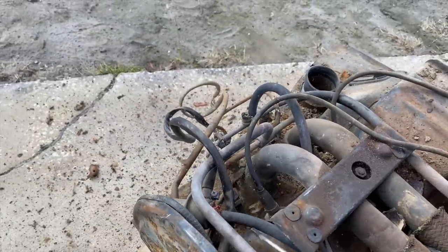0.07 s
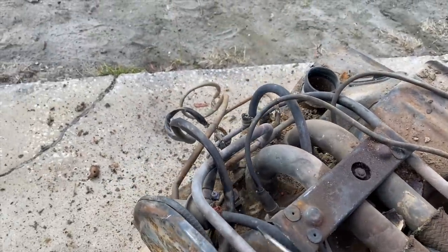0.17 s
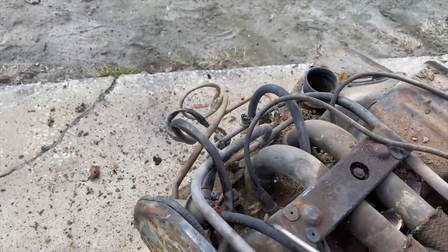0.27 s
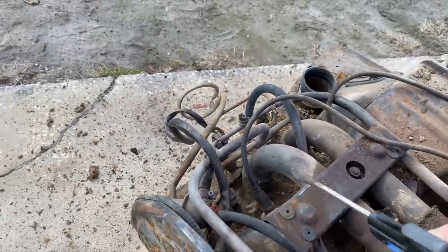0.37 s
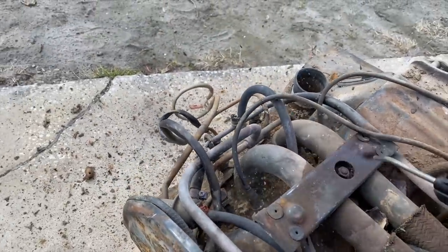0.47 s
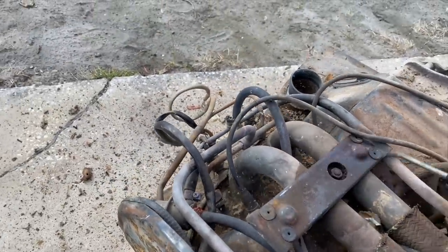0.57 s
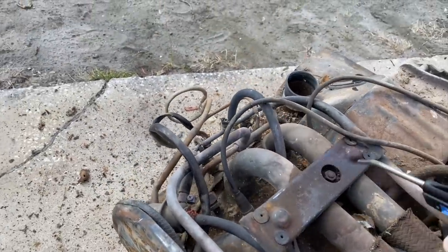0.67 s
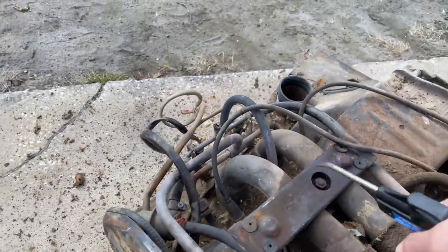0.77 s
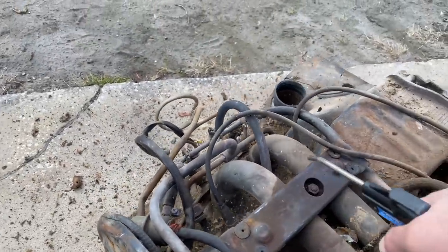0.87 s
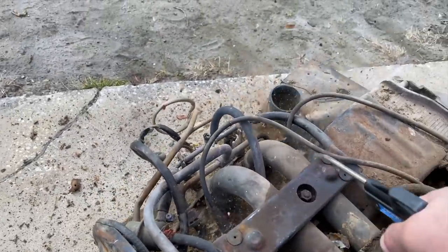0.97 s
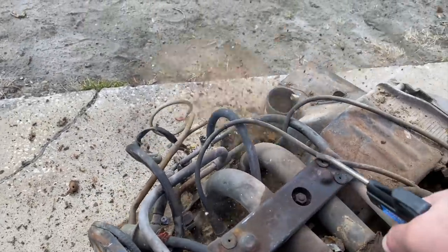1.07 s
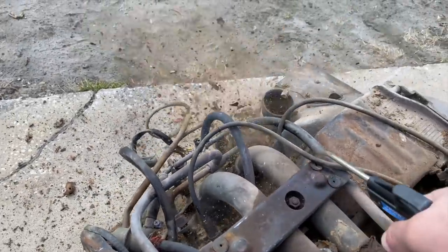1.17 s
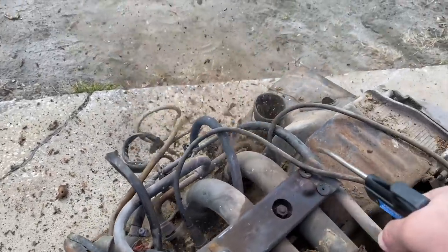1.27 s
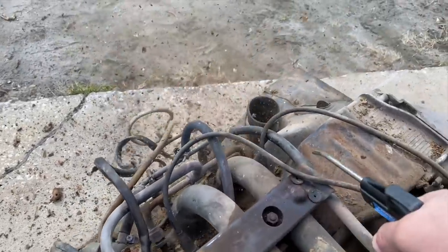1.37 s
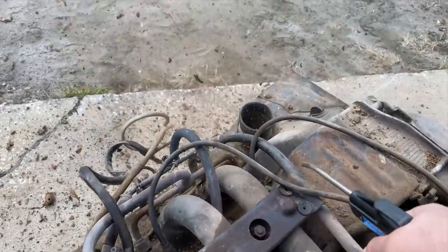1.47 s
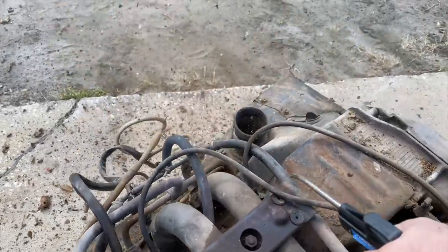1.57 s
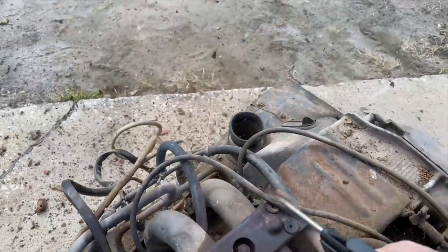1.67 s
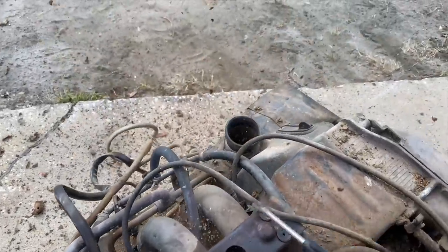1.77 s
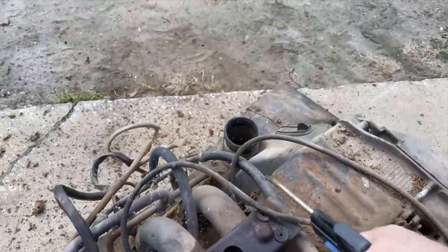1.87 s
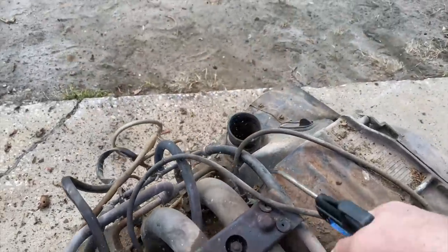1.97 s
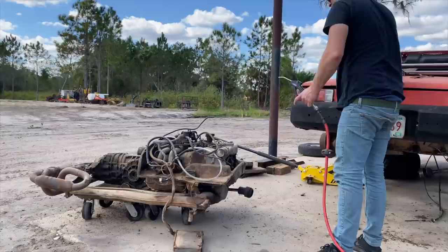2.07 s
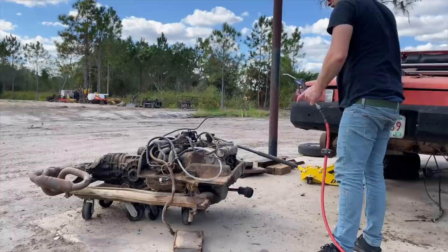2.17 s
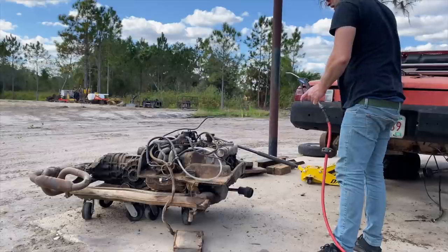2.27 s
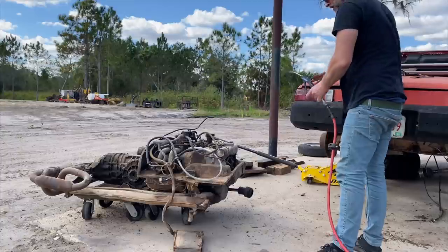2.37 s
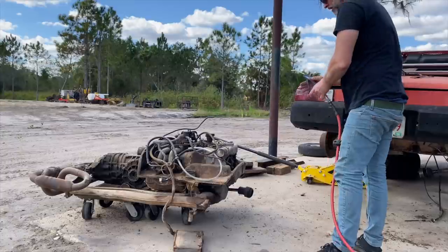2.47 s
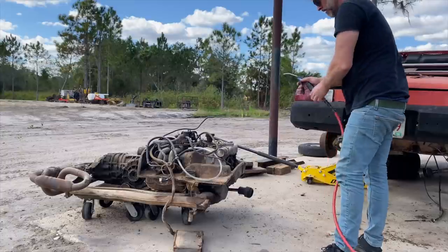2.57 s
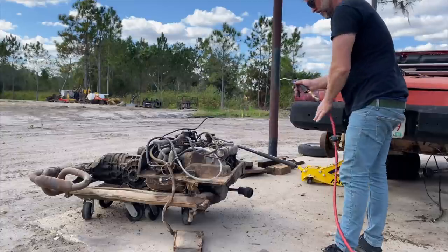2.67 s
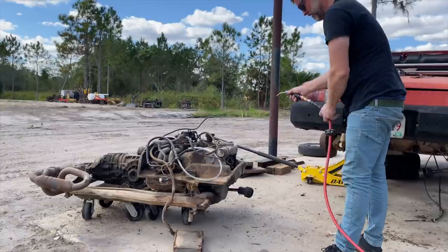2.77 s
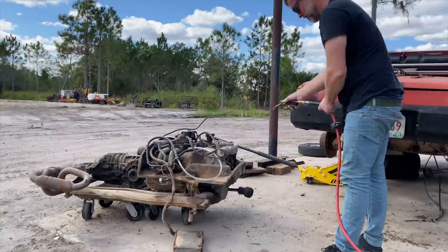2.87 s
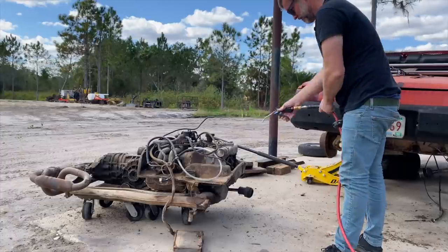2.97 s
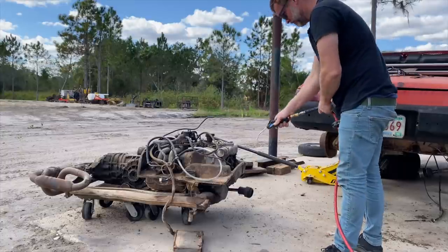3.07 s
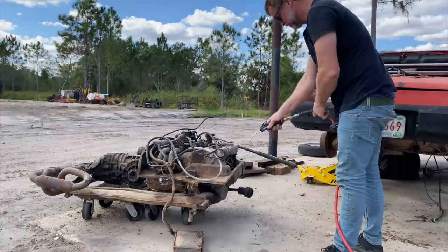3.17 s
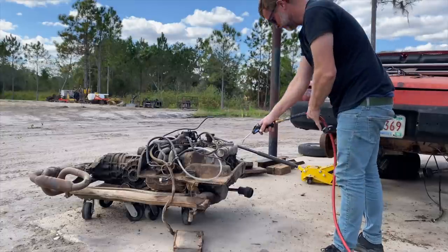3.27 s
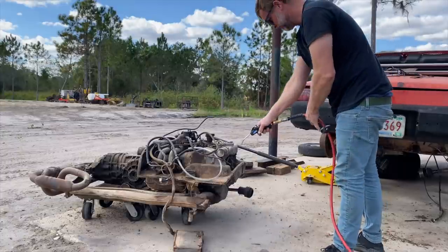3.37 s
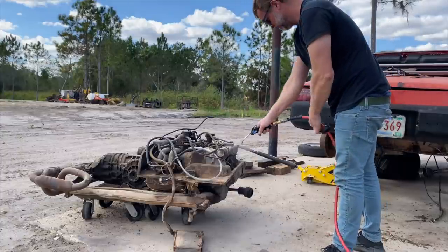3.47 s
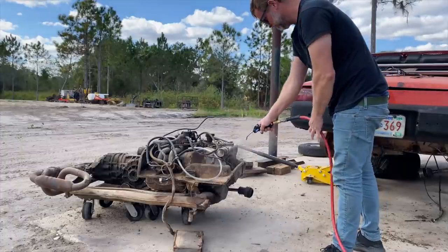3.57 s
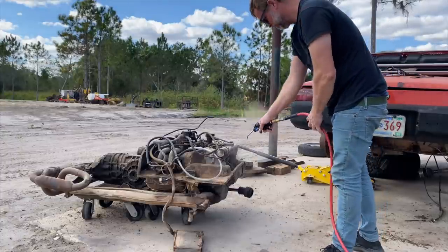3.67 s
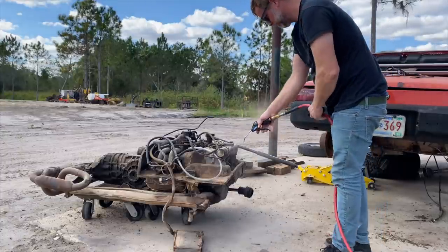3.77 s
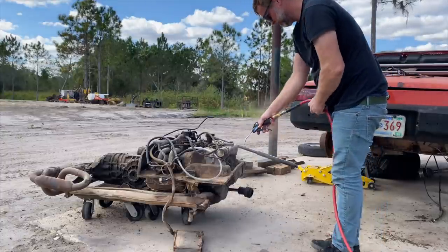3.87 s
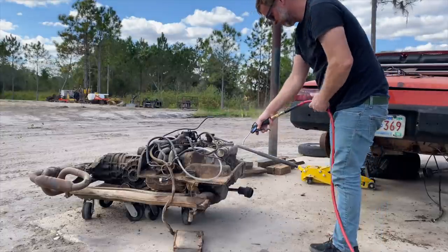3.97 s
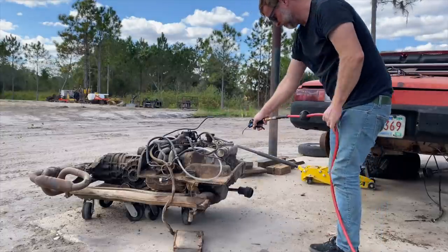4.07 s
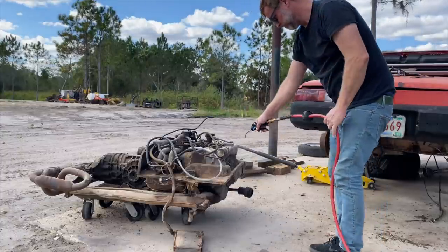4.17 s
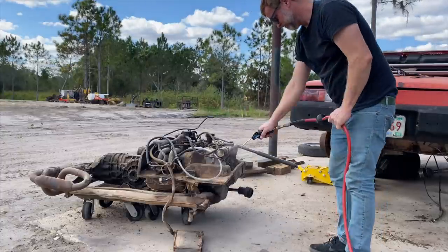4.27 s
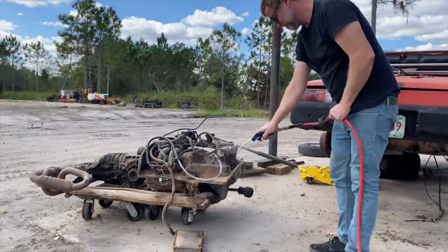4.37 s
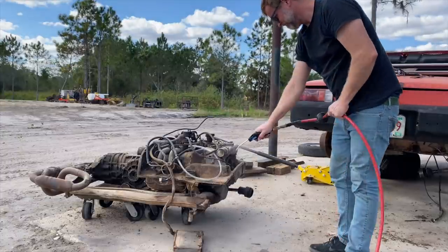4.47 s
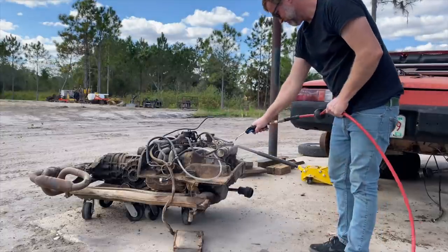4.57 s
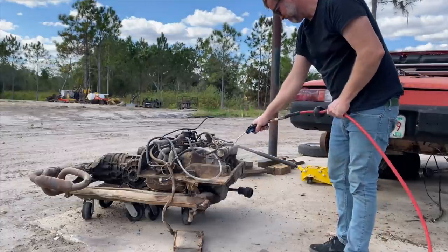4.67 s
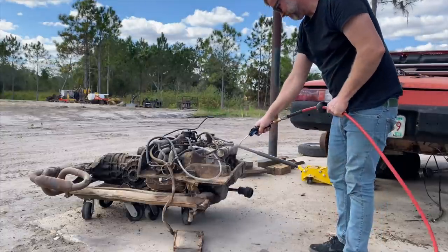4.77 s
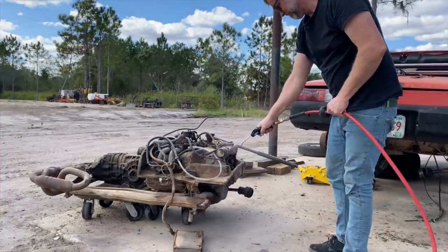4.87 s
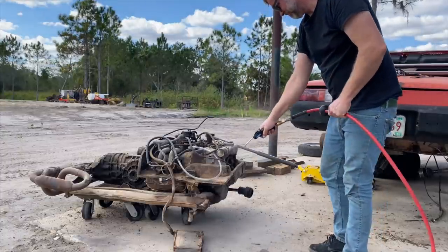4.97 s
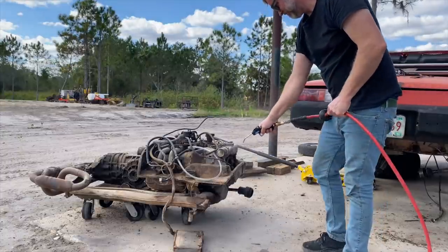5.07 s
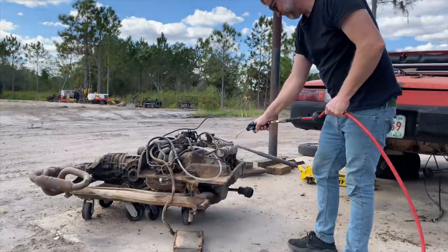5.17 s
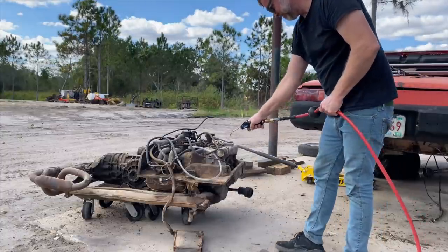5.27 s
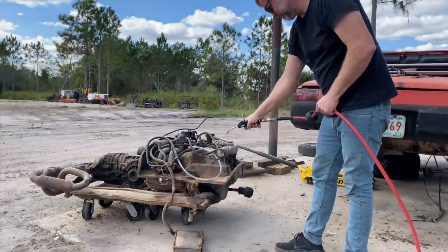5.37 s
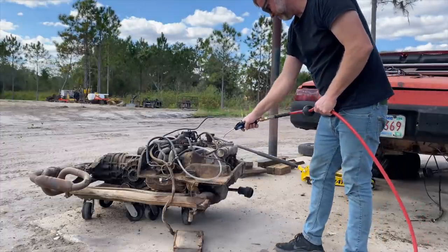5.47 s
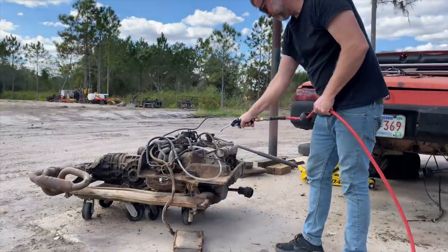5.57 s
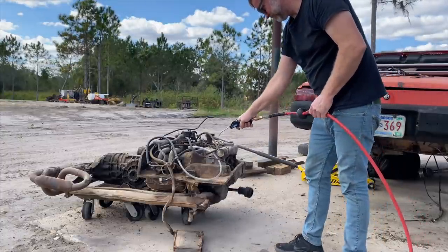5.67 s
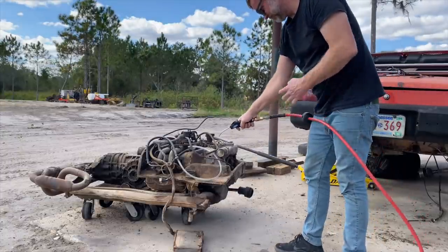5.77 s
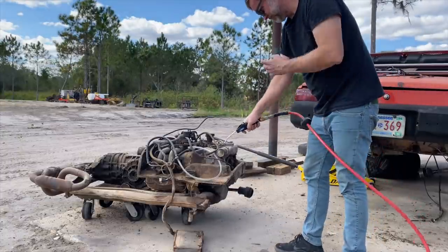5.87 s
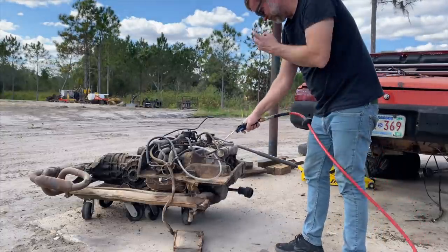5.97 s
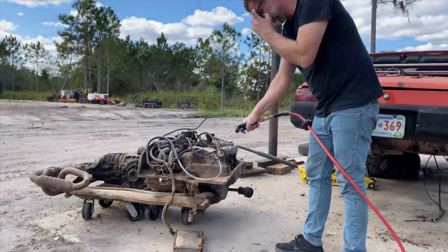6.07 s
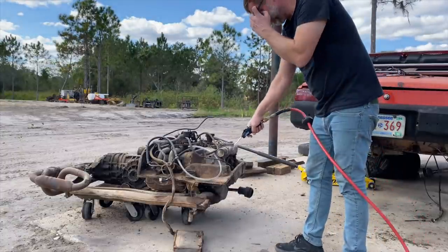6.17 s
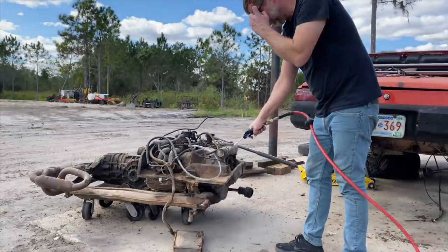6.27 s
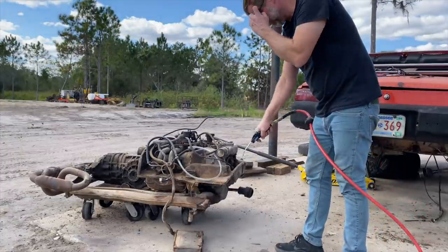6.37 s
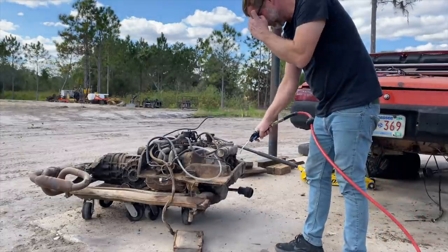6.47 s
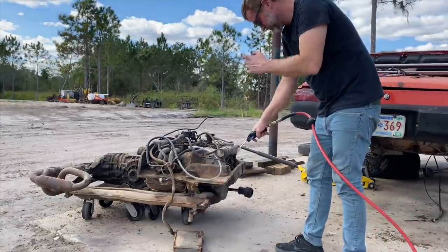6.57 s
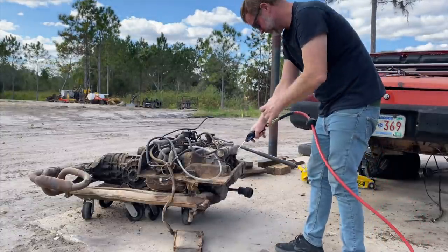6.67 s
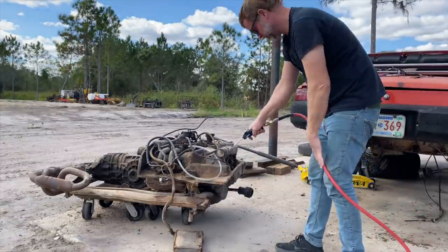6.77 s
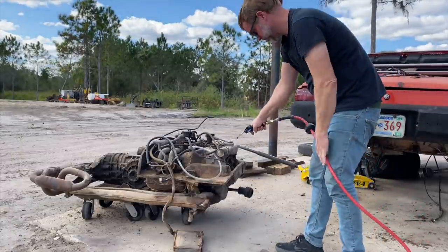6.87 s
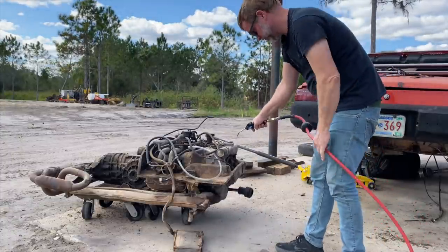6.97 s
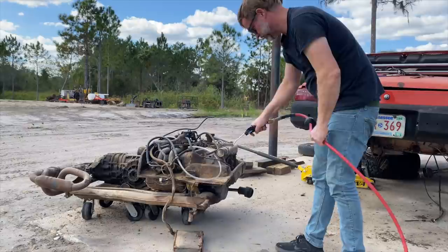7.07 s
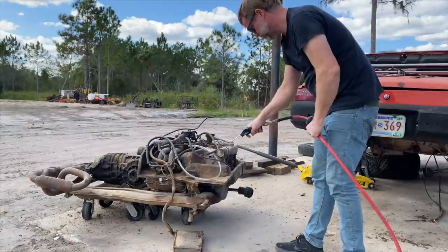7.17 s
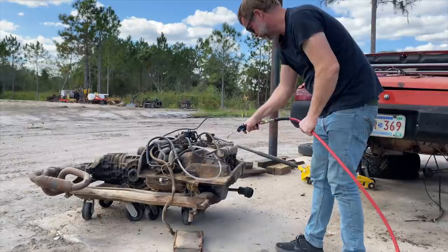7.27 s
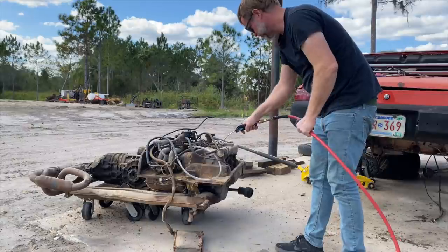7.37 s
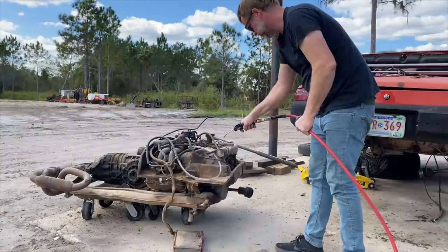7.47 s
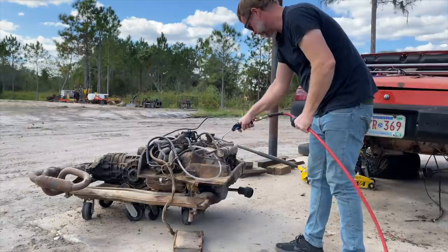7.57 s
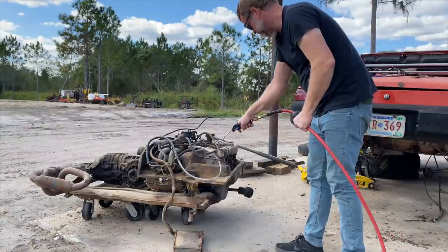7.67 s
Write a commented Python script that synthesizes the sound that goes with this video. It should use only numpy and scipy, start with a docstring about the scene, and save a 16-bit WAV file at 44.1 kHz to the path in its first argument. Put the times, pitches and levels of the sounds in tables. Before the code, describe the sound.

A compressed-air gun blasts dirt off an engine in an open yard. A close, very bright hiss wavers with breathy whistling edges and small gusts on the microphone, then stops abruptly. Faint outdoor roar and tiny fitting clicks follow. From a few steps away come a very short burst, a slightly longer one, and a long sustained blast, rougher and hollower as it sweeps over metal.

```python
"""Compressed-air blow gun on an engine

A blow gun blasts dirt off an engine on a concrete yard: first close by, then three bursts from a few steps away.
The nozzle is hissing noise, the jet rasps on edges and excites hollows, and echoes off the metal shift with the hand.
Stray gusts buffet the microphone; the fitting snaps and rings between bursts and air seeps faintly throughout.
Beneath lies a quiet yard of distant roar, lumpy breeze and faint hum."""
import sys
import numpy as np
from scipy import signal
from scipy.fft import rfft, irfft
from scipy.io import wavfile

SR = 44100
rng = np.random.default_rng(int(sys.argv[2]) if len(sys.argv) > 2 else 0)


def pcm_store(signal):
    """Save signal as 16-bit PCM."""
    levels = np.round(np.clip(np.atleast_2d(signal), -1, 1) * 32767)
    wavfile.write(sys.argv[1], SR, levels.astype(np.int16).T)


N = 341334
TIME = np.arange(N) / SR  # s
BINS = np.fft.rfftfreq(1024, 1 / SR)  # Hz
FRAMES = np.arange(N // 256 + 5) * 256 / SR  # s

# Distant outdoor roar. Each row: frequency in Hz, relative density in dB per Hz.
ROAR_SPECTRUM = [(40, -23.5), (100, 14), (300, -3), (550, -6), (850, 3.5), (1200, -2.5), (1800, -11.5),
                 (4000, -17), (12000, -34.5)]
# Yard background over time. Each row: time in seconds, distant roar in dB, low breeze in dB before its flutter.
YARD_LEVELS = [(0, -81, -64), (2.1, -63, -71), (2.17, -57, -57.5), (2.4, -57.5, -63.5), (2.7, -61, -66),
               (3.0, -75, -72.5), (3.9, -75.5, -71.5), (4.11, -73.5, -80), (4.15, -78, -75),
               (7.74, -61, -77)]
# Puffs of air when the hose is flexed. Each row: on in seconds, off in seconds, level in dB.
LEAK_PUFFS = [(2.1, 2.45, -71.5), (2.447, 2.726, -64.5), (2.486, 2.58, -61), (2.92, 3.05, -58.5),
              (3.72, 3.84, -68), (3.8, 4.11, -73), (3.915, 3.968, -67), (4.07, 4.116, -69),
              (4.172, 4.195, -66)]
# Clicks of the gun and hose fitting. Each row: start in seconds, snap peak in dB, body ring peak in dB.
FITTING_CLICKS = [(2.222, -51.5, -74), (2.2575, -49, -69), (2.461, -41, -44), (2.474, -47, -44),
                  (2.587, -46, -35), (2.5902, -33, -29), (2.596, -33, -45), (2.6, -38, -27),
                  (2.604, -38, -44), (2.6084, -35, -54), (2.6115, -36, -30), (2.617, -45, -40),
                  (2.6605, -41.5, -68), (3.907, -55, -62), (3.921, -48, -56), (4.105, -48, -54),
                  (4.176, -44, -68)]
# Modes of the gun body. Each row: frequency in Hz, relative level in dB, time to fall 60 dB in seconds.
BODY_MODES = [(1990, -19, 0.0054), (2430, 14, 0.0048), (2830, 6, 0.0057), (3300, 3, .005),
              (5930, -11, .008)]
# Gusts on the microphone. Each row: start in seconds, relative level in dB, length in seconds,
# starting brightness in Hz.
MICROPHONE_GUSTS = [(0.492, -31, 0.026, 744), (0.521, -33.5, 0.069, 1004), (0.587, -38, 0.1, 1200),
                    (1.651, -41, 0.058, 900), (1.795, -36.5, 0.031, 800), (4.005, -55.5, 0.08, 130),
                    (5.912, -47, 0.028, 900), (6.423, -49, 0.7, 150), (6.736, -41.5, 0.067, 400),
                    (7.64, -48, 0.13, 160)]
# Breathy notes as the jet crosses a lip, gap or pipe mouth. Each row: start in seconds, end in seconds,
# first pitch in Hz, last pitch in Hz, width in Hz, level in dB before the fades.
EDGE_TONES = [ (.01, 0.094, 4244, 4220, 3000, -33.5), (0.099, .3, 3100, 2960, 700, -45),
              (0.257, 0.46, 1300, 1174, 200, -42), (0.388, 0.477, 5340, 6030, 3000, -29),
              (.48, 0.653, 12750, 13100, 1200, -22.5), (0.679, 0.783, 5930, 5450, 2630, -33),
              (0.841, 1.321, 2072, 1906, 900, -44), (0.959, 1.14, 11950, 12250, 1300, -30),
              (1.17, 1.291, 12200, 12600, 1100, -29.5), (1.05, 1.178, 6360, 6500, 4000, -34.5),
              (1.471, 1.63, 4350, 4410, 2000, -38.5), (1.672, 1.899, 1800, 1620, 550, -46.5),
              (3.181, 3.502, 1088, 1000, 260, -50), (3.351, 3.73, 251, 250, 79.4, -46.5),
              (3.55, 3.63, 525, 565, 300, -43.5), (4.346, 4.514, 576, 596, 180, -43.5),
              (5.017, 5.19, 243, 209, 80, -51), (5.886, 5.965, 584, 639, 220, -43),
              (6.107, 6.254, 609, 535, 201, -46), (6.245, 6.397, 1837, 1503, 550, -42),
              (6.453, 6.898, 979, 1103, 320, -47), (7.02, 7.19, 2200, 2434, 900, -45),
              (7.34, 7.489, 2475, 2670, 1490, -39)]

# Spectra of the nozzle hiss. Each row: frequency in Hz, relative density in dB per Hz.
CLOSE_HISS = [(100, -55), (2000, -53), (5000, -11.5), (8000, -5.5), (9300, -4.5), (10500, -3), (11100, -1),
              (12100, 1), (13000, -2.5), (13900, -3.5), (15800, -8)]
FAR_HISS = [(100, -53), (1500, -25.5), (4000, -14), (6000, -8.5), (7700, -7), (9000, -6), (10200, -4),
            (11400, 1), (12700, -1.5), (14000, -5), (15800, -10)]
# Spectra of the rasp on edges. Each row: frequency in Hz, relative density in dB per Hz.
CLOSE_RASP = [(100, -41), (500, -24), (1000, -12.5), (1300, 2), (2000, 3.5), (3100, 2), (3800, 1.5),
              (5500, 1.5), (8000, -9.5), (15000, -23)]
FAR_RASP = [(100, -39.5), (500, -26), (1000, -3), (1400, -2), (1700, 2), (2000, 1), (2450, 4), (3600, 2.5),
            (5500, -1), (8000, -0.5), (15000, -9.5)]
# Resonance of the hollows between engine parts. Each row: frequency in Hz, relative density in dB per Hz.
HOLLOW_SPECTRUM = [(60, -45.5), (200, -26.5), (420, -9), (520, -7), (650, -3), (770, 0), (970, 1.5),
                   (1200, -0.5), (1650, -5), (3000, -19)]
# Spectra of the slow eddies. Each row: frequency in Hz, relative density in dB per Hz.
CLOSE_EDDIES = [(30, -29.5), (60, -17), (120, -0.5), (190, -3), (300, 2.5), (480, 0.5), (900, -20.5),
                (2000, -42)]
FAR_EDDIES = [(30, -28.5), (55, -13.5), (90, -3), (150, -4), (205, 2), (250, 3.5), (330, -3), (480, -3),
              (900, -12.5), (2000, -47.5)]

# The jet crosses an edge and rasps. Each row: on in seconds, off in seconds, rasp in dB before the layer
# trim, lift of the hiss in dB.
EDGE_PASSES = [(0.247, 0.294, -38, -0.5), (0.353, 0.597, -37.5, 0.9), (3.183, 3.436, -37, 0.5),
               (4.31, 4.358, -30, 4), (4.464, 4.568, -31.5, 0.5), (4.586, 4.652, -31, -.5),
               (4.684, 4.717, -36, 1), (5.206, 5.286, -31, 3.5), (5.415, 5.503, -27, 4),
               (5.51, 5.566, -39, 0.5), (5.655, 5.698, -31, 0.5), (5.81, 5.848, -28, 0.5),
               (5.984, 6.103, -27, 2.5), (6.248, 6.332, -32, 1.5), (6.764, 6.81, -30.5, 2),
               (7.021, 7.127, -30.5, 2), (7.138, 7.213, -28, 5), (7.228, 7.3, -29.5, 2),
               (7.364, 7.48, -28.5, -1.5), (7.498, 7.76, -31.5, -1.5)]
# The jet dips into a hollow. Each row: on in seconds, off in seconds, level in dB before slips and layer trim.
HOLLOW_PASSES = [(0.022, 0.103, -49), (0.237, 0.374, -45), (.4, 0.45, -44), (0.505, .63, -43),
                 (.96, 1.03, -48), (1.19, 1.318, -48.5), (1.63, 1.818, -47), (1.91, 2.056, -49.5),
                 (3.05, 3.094, -51), (3.189, 3.503, -39.5), (3.5, 3.665, -47.5), (4.258, 4.343, -32.5),
                 (4.375, 4.5, -38), (5.2, 5.295, -44), (5.49, 5.703, -46.5), (5.806, 5.844, -35.5),
                 (5.91, 5.933, -36.5), (5.977, 6.038, -38), (6.065, 6.387, -43), (6.447, 6.665, -44),
                 (7.257, 7.332, -37), (7.628, 7.76, -46)]
# The jet slips off the hollows into open air. Each row: on in seconds, off in seconds.
SLIPS = [(.66, .72), (.86, 0.91), (5.1, 5.14), (5.74, 5.74), (6.39, 6.455), (7.19, 7.2), (7.38, 7.6)]
# The jet spills over a broad surface and sheds slow eddies. Each row: on in seconds, off in seconds,
# level in dB before the layer trim.
SPILLS = [(.05, 0.21, -54.5), (.33, .45, -58), (0.628, 0.773, -51), (1.06, 1.257, -56), (1.61, 1.836, -55),
          (3.164, 3.3, -52), (3.363, 3.7, -48.5), (4.237, 4.32, -44), (4.745, 4.936, -50.5),
          (4.986, 5.18, -52), (5.87, 5.946, -46), (5.98, 6.14, -54), (6.348, 7.013, -45.5)]
# Close hiss as the nozzle is turned. Each row: time in seconds, level in dB before edge lifts and layer trim.
CLOSE_AIM = [(0, -25.5), (.19, -24.5), (.32, -28.5), (.53, -22), (.62, -24.5), (.69, -31), (.74, -26),
             (.81, -32), (.95, -34), (1.08, -29.5), (1.25, -31), (1.33, -29.3), (1.55, -29), (1.66, -23),
             (1.74, -29.3), (1.8, -29), (1.92, -30), (2.01, -28)]
# The far nozzle turns toward and away from the microphone. Each row: time in seconds, change of the hiss in dB.
FAR_AIM = [(4.2, 1), (4.42, -0.5), (4.85, 0.5), (5.15, -1.3), (5.37, -2.5), (5.9, .8), (6.7, 0.4),
           (6.96, -1), (7.74, 0.5)]
# Trigger pulls from a few steps away. Each row: open in seconds, shut in seconds, opening time in seconds,
# first kick in dB, then hiss, rasp, hollows and rumble in dB before kick, sag, passes and layer trim.
BURSTS = [(2.725, 2.895, 0.033, 5.5, -22, -36.5, -64, -63),
          (3.033, 3.683, 0.027, 6, -21.5, -35.5, -54.5, -57),
          (4.212, 7.8, 0.05, -0.5, -23, -35.5, -40, -53)]

SEEP_DB = -80  # steady leak at the fitting
HUM_HZ, HUM_DB = 283, -78.5
# rms change of each echo's delay as the hand moves
HAND_SWAY_S = .00025
# time that the jet takes to slide on to a part or off it
SLIDE_S = 0.037
# the valve cracks open to this share of the flow, then widens
CRACK, OPENING_POWER = 0.055, 1.95
# air stored in the hose gives a kick, then the pressure sags to a steady flow
KICK_S, SAG_DB, SAG_S = 0.045, 3.5, 0.53
SHUT_DB_PER_S = 757
CLOSE_END_S, CLOSE_STOP_DB_PER_S = 2.101, 2600
# on a broad surface the jet finds fewer edges, so the steady rasp falls
SPILL_RASP_DB = -2
# fall of the hollows during a slip
SLIP_DB = -9
# share of the close aim's change that the steady sounds of the struck parts follow
AIM_SHARE = 0.27
# upper band limit
EDGE_HZ = 15900


def gain_of(db):
    """A level in decibels is twenty times the logarithm of the amplitude ratio."""
    return 10 ** (np.asarray(db) / 20)


def evened(x):
    """Division by the root mean square gives a signal of rms one."""
    return x / np.sqrt(np.mean(x ** 2) + 1e-20)


def colour(points, hz):
    """A spectral envelope is interpolated in decibels over logarithmic frequency."""
    f, db = np.transpose(points)
    return gain_of(np.interp(np.log(hz + 1), np.log(f + 1), db))


def add(mix, s, sound):
    """Superposition: a sound is summed into the mix from s seconds on."""
    part = mix[max(round(s * SR), 0):][:len(sound)]
    part += sound[:len(part)]


def wander(length, per_s, rate_hz):
    """Low-passed white noise is a smooth random course, here of rms about one and sampled per_s times a second."""
    hz = np.fft.rfftfreq(2 * length, 1 / per_s)
    spectrum = rfft(rng.standard_normal(2 * length)) / (1 + (hz / rate_hz) ** 2)
    return evened(irfft(spectrum)[:length])


def flutter(rate_hz, depth_db):
    """Slow random amplitude modulation makes a flow sound unsteady."""
    course = wander(len(FRAMES), 1 / FRAMES[1], rate_hz)
    return gain_of(depth_db * np.interp(TIME, FRAMES, course))


def noise(shape):
    """Turbulence radiates random noise; a fixed or moving spectrum shapes it, at rms one."""
    a, b = rng.standard_normal((2, len(FRAMES), len(BINS)))
    spectra = (a + 1j * b) * shape
    return evened(signal.istft(spectra.T, nperseg=1024, noverlap=768)[1][:N])


def held(on, off):
    """A jet of finite breadth meets a part gradually: the gain slides to one, holds and slides back."""
    middle = (on + off) / 2
    full_from, full_to = min(on + SLIDE_S / 2, middle), max(off - SLIDE_S / 2, middle)
    return np.interp(TIME, [on - SLIDE_S / 2, full_from, full_to, off + SLIDE_S / 2], [0, 1, 1, 0])


def swells(steady_db, passes):
    """Incoherent sources add in power: each pass raises the gain of a steady level."""
    added_power = sum((gain_of(db) * held(on, off)) ** 2 for on, off, db, *_ in passes)
    return np.sqrt(gain_of(steady_db) ** 2 + added_power)


def yard():
    """Ambient sound is a sum of independent sources: distant roar, lumpy breeze and wavering hum."""
    s, *columns = np.transpose(YARD_LEVELS)
    roar_gain, breeze_gain = (gain_of(np.interp(TIME, s, db)) for db in columns)
    tone = np.sin(2 * np.pi * HUM_HZ * TIME) * flutter(rate_hz=8, depth_db=1)
    hum = gain_of(HUM_DB) * evened(tone)
    roar = roar_gain * noise(colour(ROAR_SPECTRUM, BINS))
    breeze = breeze_gain * noise(colour(FAR_EDDIES, BINS)) * flutter(rate_hz=18, depth_db=4.5)
    return hum + roar + breeze


def leak(edge_db=-10):
    """A thin stream of air through a gap is turbulent: it seeps all the time and puffs when the hose is flexed."""
    shape = colour(FAR_HISS, BINS) + gain_of(edge_db) * colour(FAR_RASP, BINS)
    return swells(SEEP_DB, LEAK_PUFFS) * noise(shape)


def fitting(snap_s=0.00049, scatter_db=-7, scatter_s=0.01):
    """An impulse rings the damped modes of the gun body; ground and nearby metal scatter it briefly."""
    t, out = TIME[:SR // 10], np.zeros(N)
    ring = sum(gain_of(db - 60 * t / t60) * np.sin(2 * np.pi * hz * t) for hz, db, t60 in BODY_MODES)
    band = signal.butter(2, [6500, 14500], "band", fs=SR, output="sos")
    for s, snap_db, ring_db in FITTING_CLICKS:
        snap = signal.sosfilt(band, rng.standard_normal(len(t)) * np.exp(-t / snap_s))
        snap_part = gain_of(snap_db) * snap / abs(snap).max()
        ring_part = gain_of(ring_db) * ring / abs(ring).max()
        add(out, s, snap_part + ring_part)
    tail = rng.standard_normal(len(t)) * np.exp(-t / scatter_s)
    scattered = signal.oaconvolve(out, tail / np.linalg.norm(tail))[:N]
    return out + gain_of(scatter_db) * scattered


def gusts(dulling=1.0, low_hz=90, steepness=4.6):
    """Turbulent pressure on the microphone loses its high frequencies as the flow slows: bright, then dull."""
    out = np.zeros(N)
    for s, db, length, bright_hz in MICROPHONE_GUSTS:
        corner = bright_hz * np.exp(-dulling * np.clip((FRAMES - s) / length, 0, 1))[:, None]
        low_cut = (BINS / np.hypot(BINS, low_hz)) ** 2
        high_cut = 1 / np.sqrt(1 + (BINS / corner) ** steepness)
        shape = low_cut * high_cut / np.sqrt(corner)
        age = np.maximum(TIME - s, 0) / (length / 4)  # the envelope peaks at age one
        out += gain_of(db) * age * np.exp(1 - age) * noise(shape)
    return out * flutter(rate_hz=45, depth_db=2.0)


def edge_tones(fade=0.36):
    """Turbulence excites a resonance: a narrow noise band glides in pitch as the jet is swept past."""
    out = np.zeros(N)
    for start, end, first_hz, last_hz, width_hz, db in EDGE_TONES:
        length = max(round((end - start) * SR), 256)
        a, b = rng.standard_normal((2, SR))
        low_pass = signal.butter(2, width_hz / 2, fs=SR, output="sos")
        eddies = signal.sosfilt(low_pass, a + 1j * b)[-length:]
        # a turning phase carries the low band up to the gliding pitch
        turn = np.exp(2j * np.pi * np.cumsum(np.linspace(first_hz, last_hz, length)) / SR)
        note = evened((eddies * turn).real) * signal.windows.tukey(length, fade)
        add(out, start, gain_of(db) * note)
    return out


def engine_echoes(share, shortest_s, longest_s, count):
    """Copies of the jet off pipes and covers interfere; delays drift with the hand, so the comb of notches moves."""
    paths = np.ones((len(FRAMES), len(BINS)), complex)
    for k, delay in enumerate(np.geomspace(shortest_s, longest_s, count)):
        drift = wander(len(FRAMES), 1 / FRAMES[1], rate_hz=1)
        moving_delay = (delay + HAND_SWAY_S * drift)[:, None]
        paths += (-1) ** k * share * np.exp(-2j * np.pi * moving_delay * BINS)  # alternate signs
    return abs(paths)


def grit(per_s):
    """Impacts of loosened sand on metal form a random pulse train of tiny band-passed ticks."""
    hits = (rng.random(N) < per_s / SR) * rng.standard_normal(N)
    band = signal.butter(2, [1500, 9000], "band", fs=SR, output="sos")
    return evened(signal.sosfilt(band, hits))


def beaming(tilt_db=0.9, rate_hz=4):
    """Directivity beams the treble, so the hiss brightens and dulls as the hand trembles (rms dB per octave)."""
    octaves = np.log2(np.clip(BINS, 4000, 16000) / 10000)
    tremble = wander(len(FRAMES), 1 / FRAMES[1], rate_hz)[:, None]
    return gain_of(tilt_db * tremble * octaves)


def valve(opens, shuts, opening_s):
    """Flow grows with the open area: the valve cracks, widens, and chokes the flow exponentially on closing."""
    opened = np.clip((TIME - opens) / opening_s, 0, 1)
    widening = CRACK + (1 - CRACK) * opened ** OPENING_POWER
    closing = gain_of(-SHUT_DB_PER_S * np.maximum(TIME - shuts, 0))
    return (TIME > opens) * widening * closing


def strike(flow, hiss_db, rasp_db, hollow_db, rumble_db):
    """Flow meeting solid parts gains new sources: gains of hiss, rasp, hollows and rumble along the sweep."""
    hiss = gain_of(hiss_db + sum(lift_db * held(on, off) for on, off, _, lift_db in EDGE_PASSES))
    spilling = sum(held(on, off) for on, off, _ in SPILLS)
    rasp = swells(rasp_db + SPILL_RASP_DB * spilling, EDGE_PASSES)
    slipping = sum(held(on, off) for on, off in SLIPS)
    hollow = swells(hollow_db, HOLLOW_PASSES) * gain_of(SLIP_DB * slipping)
    return flow * np.array([hiss, rasp, hollow, swells(rumble_db, SPILLS)])


def far_blasts():
    """Stored pressure relaxes exponentially: in each pull all steady layers follow the kick and sag of the hose."""
    flow, layers_db = np.zeros(N), np.zeros((4, N))
    for opens, shuts, opening_s, kick_db, *steady_db in BURSTS:
        age = np.maximum(TIME - opens - opening_s, 0)
        pressure_db = kick_db * np.exp(-age / KICK_S) - SAG_DB * (1 - np.exp(-age / SAG_S))
        flow += valve(opens, shuts, opening_s)
        layers_db = np.where(TIME > opens, np.array(steady_db)[:, None] + pressure_db, layers_db)
    hiss_db, *others_db = layers_db
    return strike(flow, hiss_db + np.interp(TIME, *np.transpose(FAR_AIM)), *others_db)


def close_blast(rasp_db=-37, hollow_db=-51, rumble_db=-61):
    """Level depends on aim in a flow already open: the nozzle is turned, then the blast stops abruptly."""
    flow = gain_of(-CLOSE_STOP_DB_PER_S * np.clip(TIME - CLOSE_END_S, 0, .1))
    s, aim_db = np.transpose(CLOSE_AIM)
    hiss_db = np.interp(TIME, s, aim_db)
    follow_db = AIM_SHARE * (hiss_db - aim_db.mean())
    return strike(flow, hiss_db, rasp_db + follow_db, hollow_db + follow_db, rumble_db + follow_db)


def jet(gains, hiss_shape, rasp_shape, eddy_shape, echoes, hiss_db, rasp_db, hollow_db, rumble_db, grit_db):
    """Eddy size sets pitch: fine eddies hiss at the nozzle, larger ones on the engine are lower and more ragged."""
    hiss, rasp, hollow, rumble = gains
    nozzle = gain_of(hiss_db) * hiss * noise(colour(hiss_shape, BINS) * echoes * beaming())
    scrape = gain_of(rasp_db) * noise(colour(rasp_shape, BINS) * echoes)
    edges = rasp * (scrape + gain_of(grit_db) * grit(per_s=980))
    cavities = gain_of(hollow_db) * hollow * noise(colour(HOLLOW_SPECTRUM, BINS) * echoes)
    eddies = gain_of(rumble_db) * rumble * noise(colour(eddy_shape, BINS))
    struck = edges * flutter(rate_hz=27, depth_db=0.88) + cavities * flutter(rate_hz=23, depth_db=1.53)
    stream = (nozzle + struck) * flutter(rate_hz=22, depth_db=0.8)
    return stream + eddies * flutter(rate_hz=14, depth_db=2.5)


def scene():
    """Superposition of the close and far jets with the lesser sources, alike in both channels."""
    close_echoes = engine_echoes(share=0.12, shortest_s=0.000695, longest_s=.003, count=12)
    far_echoes = engine_echoes(share=0.15, shortest_s=0.000907, longest_s=.005, count=14)
    close = jet(close_blast(), CLOSE_HISS, CLOSE_RASP, CLOSE_EDDIES, close_echoes,
                hiss_db=0.5, rasp_db=-0.4, hollow_db=1.0, rumble_db=-2.5, grit_db=-9.0)
    far = jet(far_blasts(), FAR_HISS, FAR_RASP, FAR_EDDIES, far_echoes,
              hiss_db=0, rasp_db=0.0, hollow_db=0.0, rumble_db=-3.5, grit_db=-9.5)
    mix = close + far + edge_tones() + gusts() + fitting() + leak() + yard()
    return np.tile(mix, (2, 1))


def record(dry, low_cut_hz=55):
    """A transducer passes a finite band: the microphone sheds deep bass, then a steep filter ends the treble."""
    thinned = signal.sosfilt(signal.butter(2, low_cut_hz, "high", fs=SR, output="sos"), dry)
    low_pass = signal.firwin(511, EDGE_HZ, window=("kaiser", 9), fs=SR)
    return signal.oaconvolve(thinned, low_pass[None], "same")


dry = scene()
out = record(dry)
pcm_store(out)
```